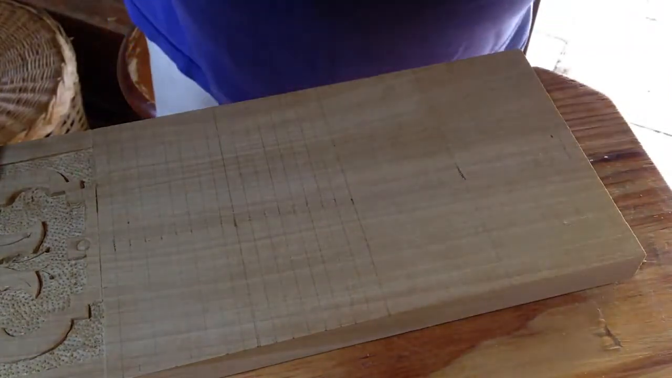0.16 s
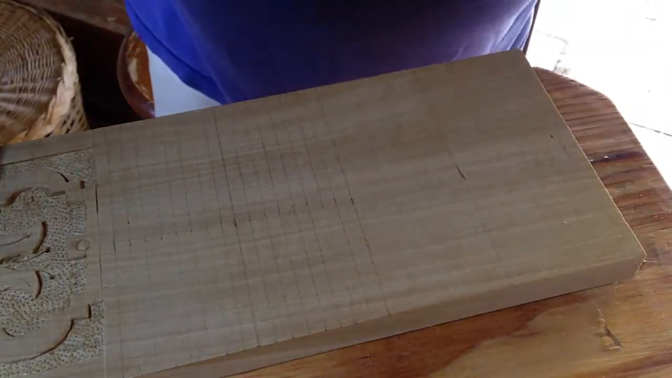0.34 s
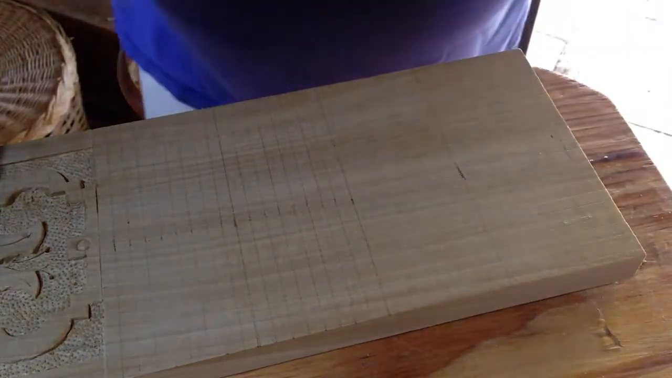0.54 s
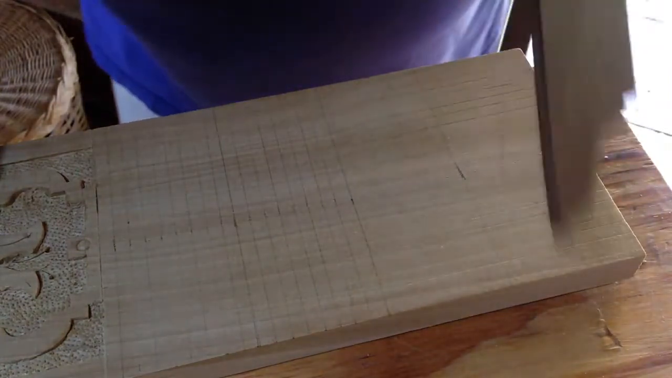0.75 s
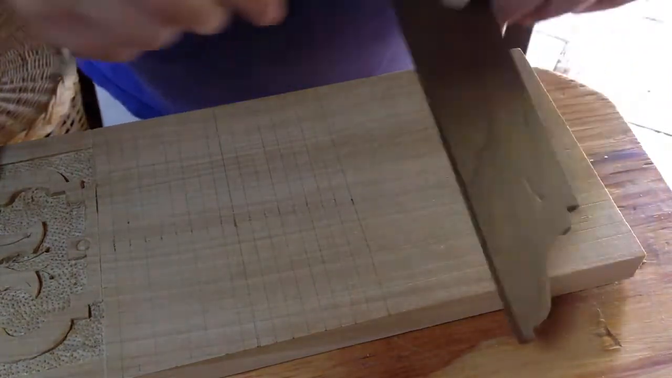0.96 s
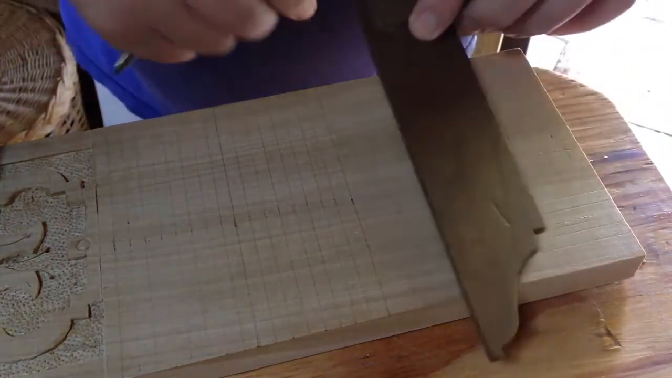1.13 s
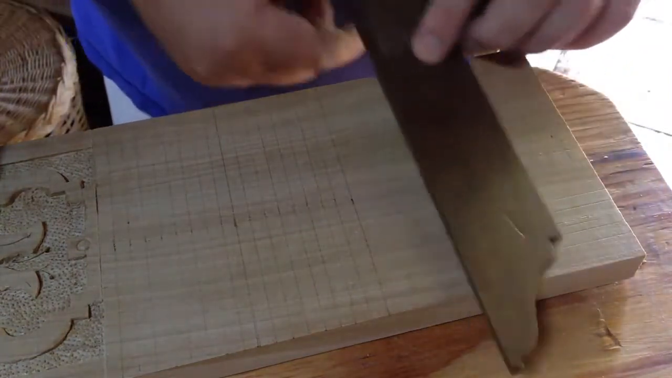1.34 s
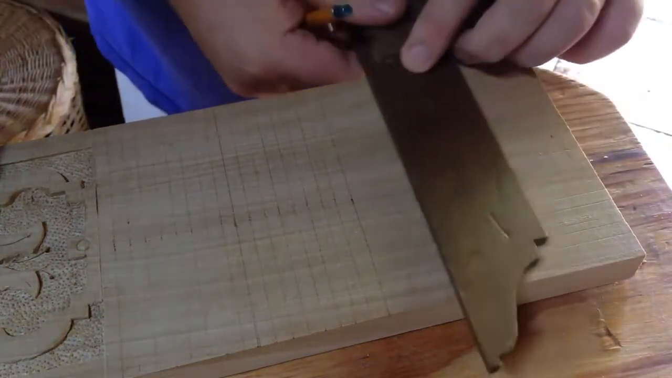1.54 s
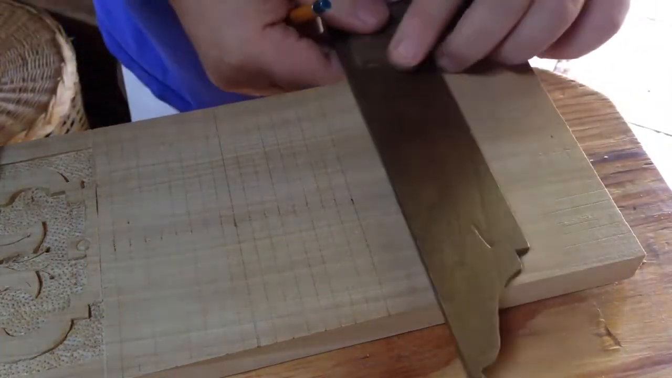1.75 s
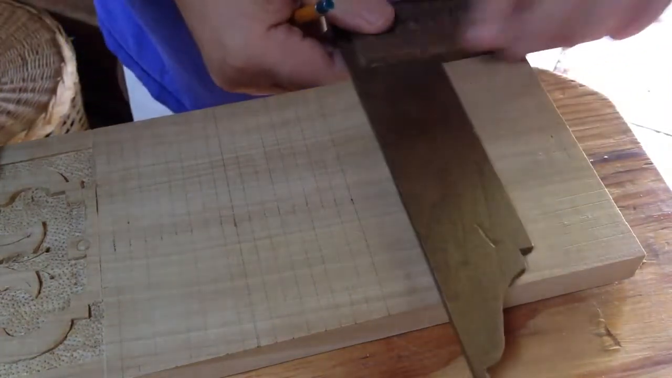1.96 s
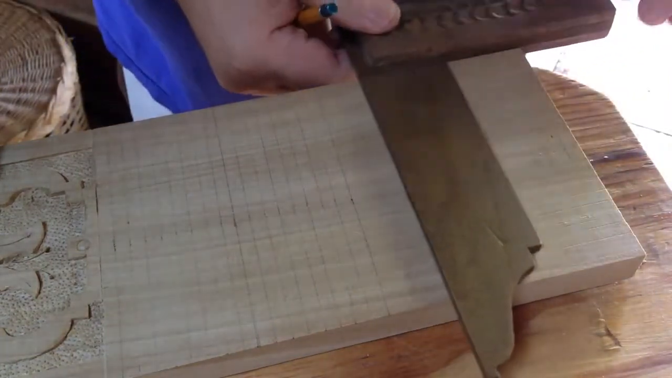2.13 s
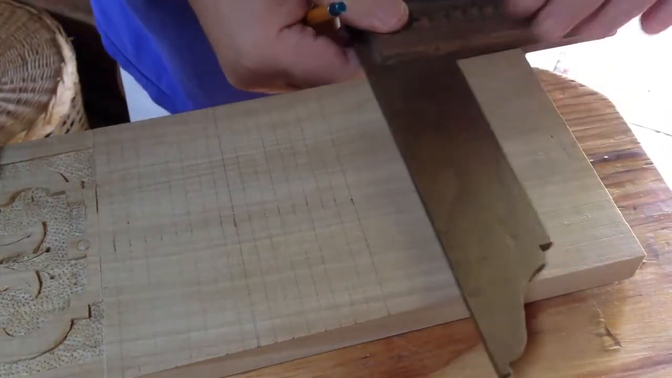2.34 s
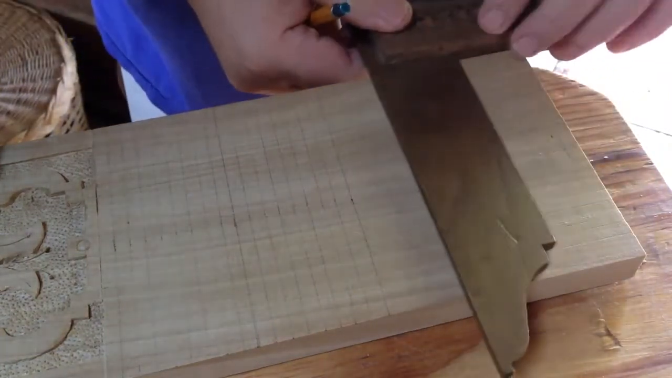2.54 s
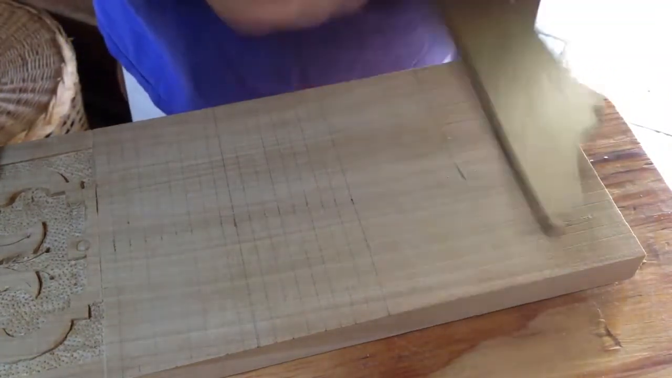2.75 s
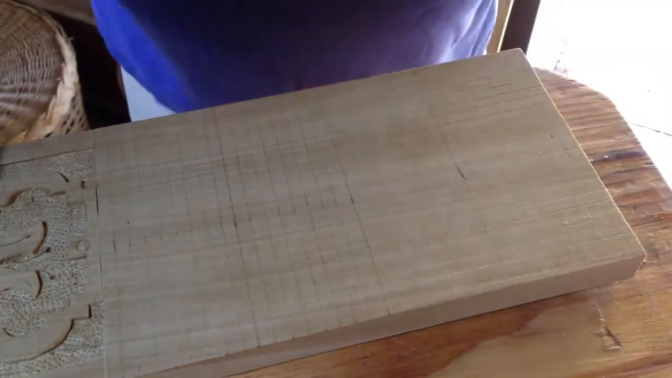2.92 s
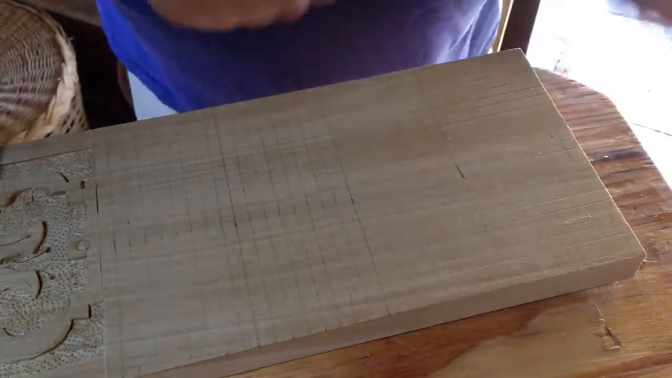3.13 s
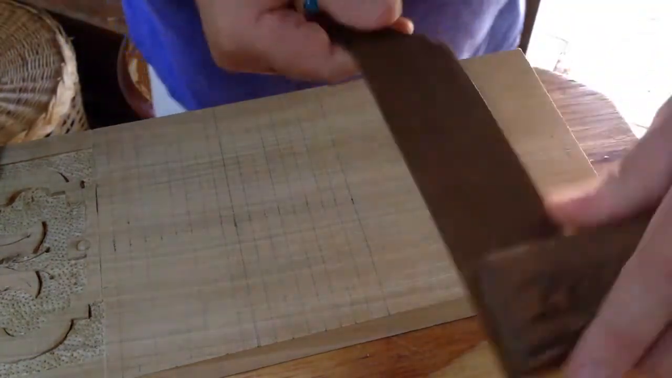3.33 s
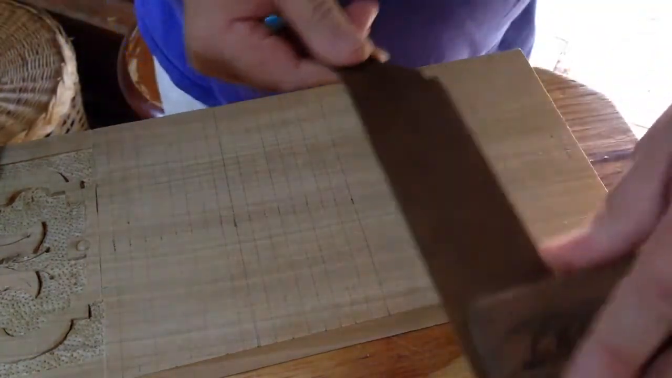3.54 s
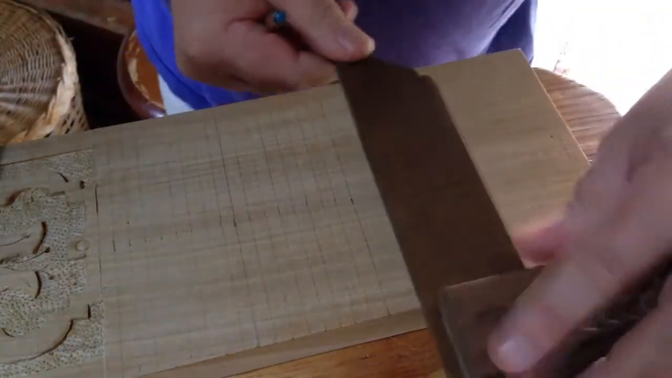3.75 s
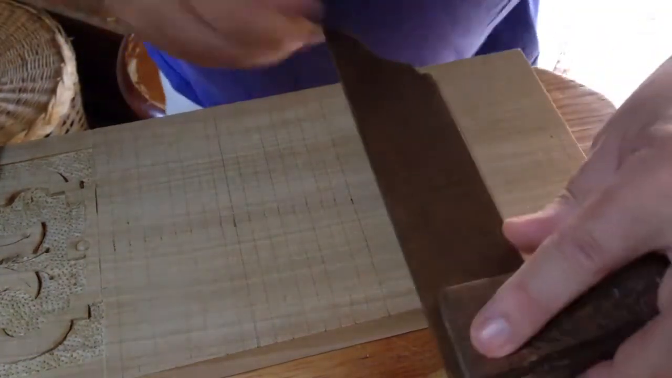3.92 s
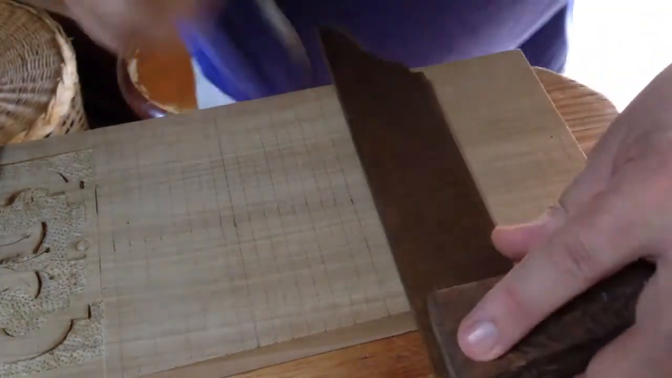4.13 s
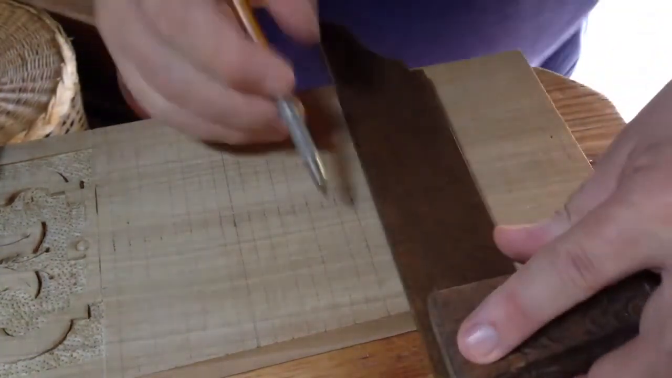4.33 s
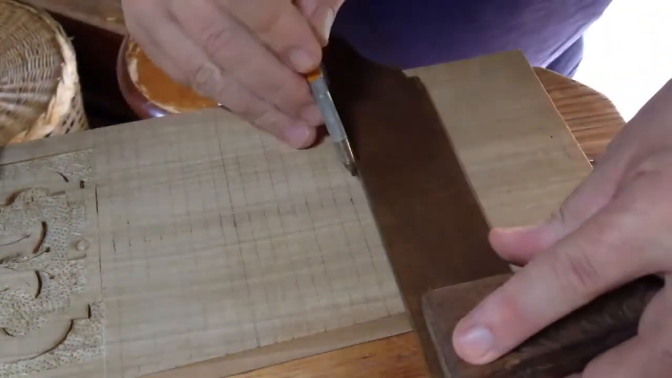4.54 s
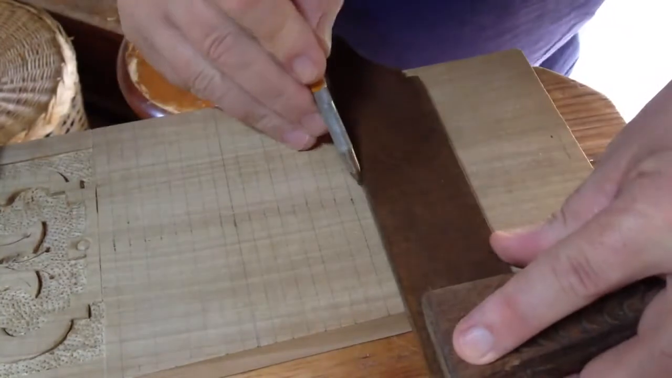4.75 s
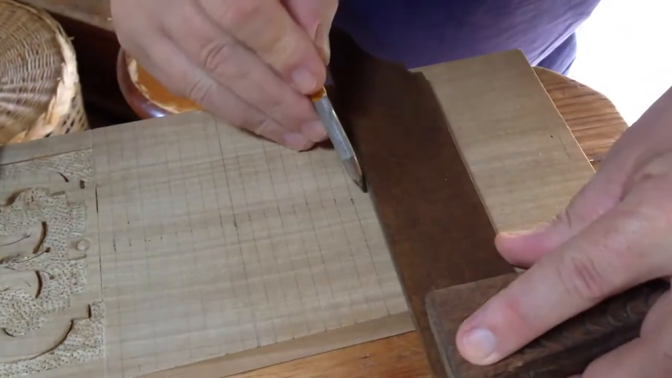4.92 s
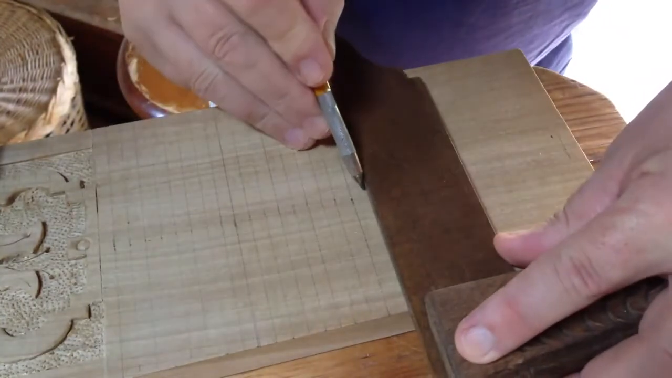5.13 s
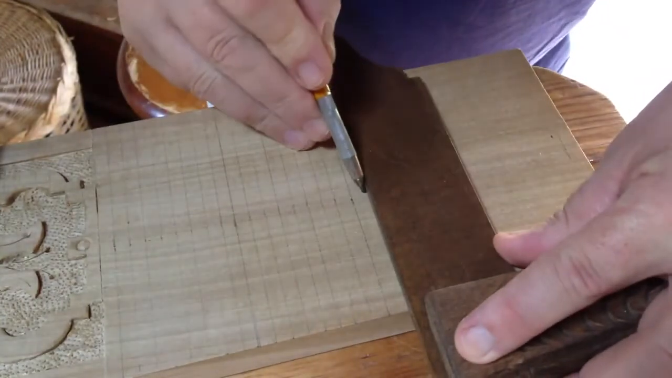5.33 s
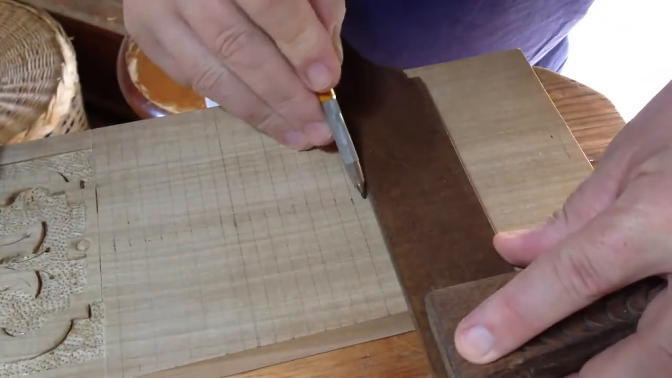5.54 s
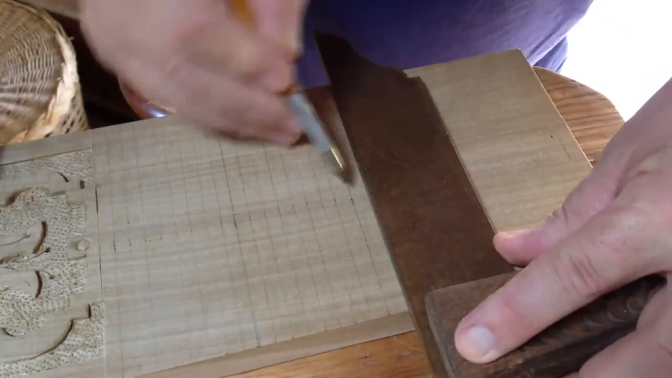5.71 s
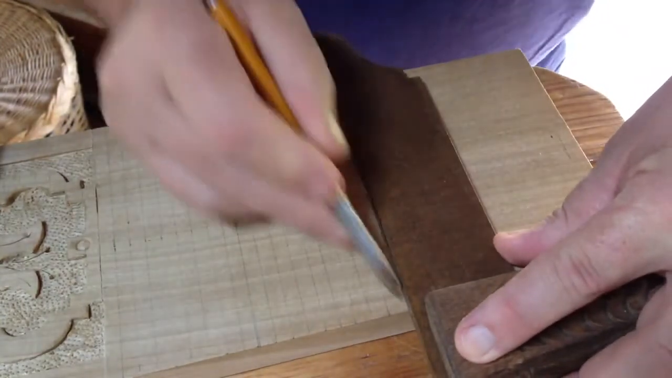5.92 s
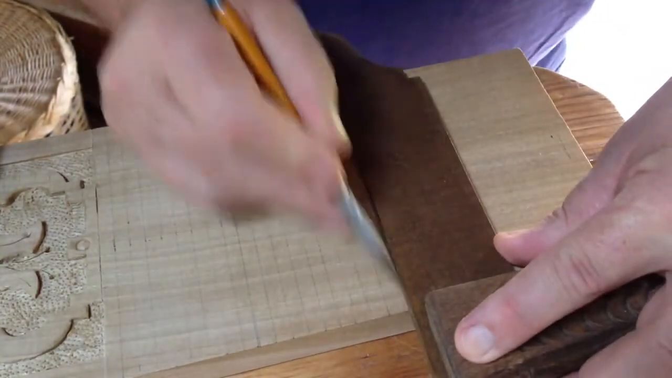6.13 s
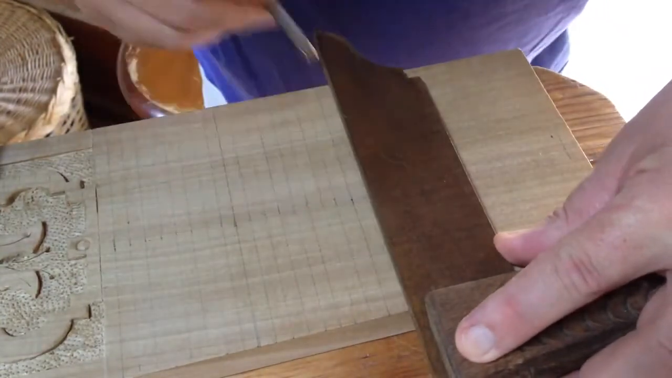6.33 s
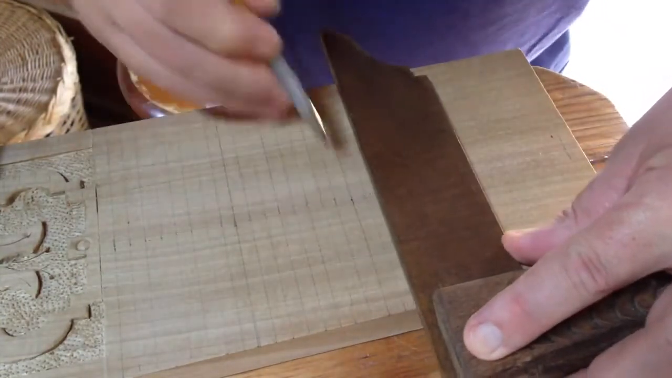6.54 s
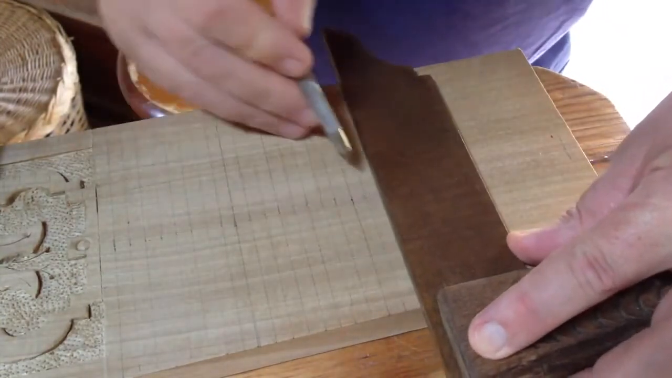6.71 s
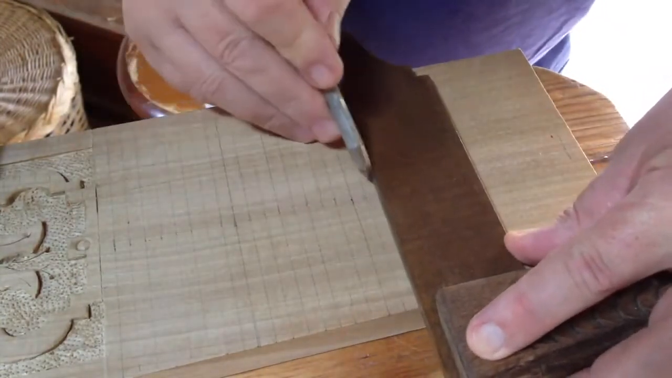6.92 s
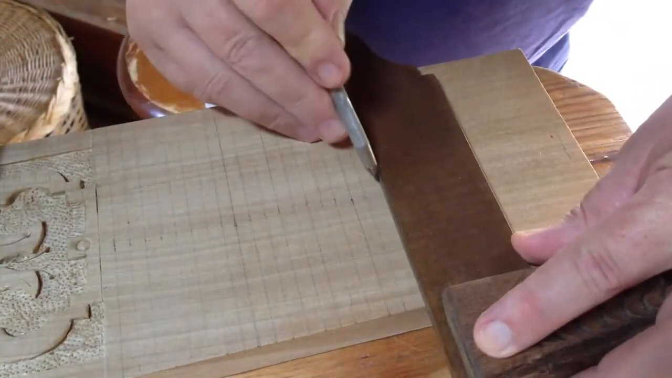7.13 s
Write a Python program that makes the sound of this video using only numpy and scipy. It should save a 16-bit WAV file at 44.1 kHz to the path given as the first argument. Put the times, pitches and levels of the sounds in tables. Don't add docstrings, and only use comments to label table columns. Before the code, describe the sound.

A quiet workshop heard close up, with faint hiss, an unsteady low motor hum and a short woody room tail. The first second holds only soft rubbing and a small scuff near 0.7. At 1.2 a wooden square knocks the plank sharply, twice in quick succession, followed by scuffs, a firm knock at 1.5 and a light press at 1.8; thin birds pipe far off. Gentle handling until scuffs at 2.7-2.9 and sleeve rustle. At 3.5 the square drops flat with a loud clack, drags, and is pressed home with two hard knocks around 3.7, plus low palm thumps to 4.1. Then near quiet, with tiny nudges at 4.6-4.8 and faint ticks. Light pencil touches come at 5.7-6.1, then a brief rasping stroke from 6.2 to 6.45, gritty and catching, strongest near 6.36. A last nudge at 6.7, faint bird whistles and a tiny scuff end it by 7.3.

```python
import sys
import numpy as np
from scipy import signal
from scipy.fft import rfft, irfft, next_fast_len
from scipy.io import wavfile
from scipy.ndimage import uniform_filter1d, map_coordinates

SR = 44100
rng = np.random.default_rng(int(sys.argv[2]) if len(sys.argv) > 2 else 0)


def voltage_ratio(decibels):
    exponent = np.asarray(decibels, float) / 20
    return 10 ** exponent


def materialize(psi):
    bounded = np.clip(np.atleast_2d(psi).T, -1, 1)
    quanta = np.round(bounded * 32767).astype(np.int16)
    wavfile.write(sys.argv[1], SR, quanta)


N = 320607

# f/Hz, level/dB, t60/s
SQUARE_MODES = [(292.4, 7.5, 0.1), (428, -4.5, 0.084), (544, 6, 0.028), (706, 2, 0.032), (1400, -5, 0.077),
                (1358, -2, 0.038), (1208, -7.5, 0.045), (1826, -12, 0.081), (2130, -4.5, 0.075),
                (2480, 1.5, 0.045), (2700, 0.5, 0.0184), (3334, 0.5, 0.032), (3754, 0.5, 0.034),
                (4380, -15, 0.0406), (4730, 6.5, 0.017), (5080, 6.5, 0.012), (6460, -7, 0.017),
                (6714, -3, 0.026), (7880, -16, 0.0094), (8540, -14.5, 0.0074)]
LEAD_IN_S = 0.0007


def unit(x):
    return x / np.sqrt(np.mean(x ** 2) + 1e-20)


def along(points, hz):
    f, v = np.transpose(points)
    return np.interp(np.log(hz + 1), np.log(f + 1), v)


def curves(rows):
    s, *cols = np.transpose(rows)
    return [np.interp(np.arange(N) / SR, s, c) for c in cols]


def wobble(rate_hz):
    knots = rng.standard_normal(int(N * rate_hz / SR) + 4)
    return map_coordinates(knots, [np.arange(N) * rate_hz / SR])


def filtered(x, response):
    m = next_fast_len(N + SR // 2)
    return irfft(rfft(x, m) * response(np.fft.rfftfreq(m, 1 / SR)), m)[..., :N]


def resonant(x, peaks):
    def response(f):
        total = 0
        for k, (centre, width, db) in enumerate(peaks):
            damping = 1j * f * width
            total = total + (-1) ** k * voltage_ratio(db) * damping / (centre * centre - f * f + damping)
        return total
    return unit(filtered(x, response))


def coloured(x, spectrum):
    return unit(filtered(x, lambda hz: voltage_ratio(along(spectrum, hz))))


def patchy(x, depth_db, size):
    z = signal.stft(x, nperseg=size)[2]
    field = uniform_filter1d(rng.standard_normal(z.shape), 6, 0)
    field = uniform_filter1d(field, 10, 1)
    return signal.istft(z * voltage_ratio(depth_db * unit(field)), nperseg=size)[1][:N]


def grains(rate_hz, spread_db):
    hit = rng.random(N) < rate_hz / SR
    sign = rng.choice([-1, 1], N)
    return unit(hit * sign * voltage_ratio(spread_db * np.clip(rng.exponential(size=N), 0, 3)))


def gesture(start_s, length_s, rise_s, fade_s):
    t = np.arange(N) / SR - start_s
    return np.clip(t / rise_s, 0, 1) ** 2 * np.exp(-np.clip(t - length_s, 0, None) / fade_s)


def air():
    # f/Hz, level/dB per Hz
    floor = [(12, -64.5), (20, -36.5), (62, -10.5), (118, -8.5), (152, -9), (185, -14), (231, -16),
             (304, -23), (531, -26.5), (741, -30.5), (1220, -34.5), (1360, -43), (1660, -34), (2010, -33.5),
             (15300, -35.5)]
    return voltage_ratio(-66) * coloured(patchy(rng.standard_normal(N), 0.85, size=512), floor)


def hum():
    # t/s, level/dB
    loudness = [(0, -92), (.16, -73), (.56, -71), (.65, -89), (.81, -69.5), (1.4, -80), (1.6, -71.5),
                (2.55, -58), (3.55, -60.5), (3.68, -71.5), (3.83, -61), (4.4, -63.5), (4.78, -67),
                (5.3, -63.5), (6.28, -60.5), (7.27, -65.5)]
    # multiple of main order, level/dB
    orders = [(.5, -19.5), (1.5, -20.5), (2, -27.5), (2.5, -29)]
    turn = 2 * np.pi * np.cumsum(152.3 + 0.733 * wobble(4)) / SR
    weak = sum(voltage_ratio(db + 1.1 * wobble(3.2)) * np.sin(k * turn) for k, db in orders)
    main = voltage_ratio(0.33 * wobble(14)) * np.sin(turn)
    return np.sqrt(2) * voltage_ratio(curves(loudness)[0]) * (main + weak)


def birds():
    # start t/s, end t/s, f/Hz, level/dB
    pipes = [(1.27, 1.37, 3080, -66), (1.61, 1.654, 3050, -66), (1.659, 1.713, 3010, -64),
             (4.44, 4.57, 4270, -73.5), (6.018, 6.042, 3080, -71), (6.528, 6.556, 3160, -71),
             (6.567, 6.607, 3170, -71), (6.605, 6.715, 4755, -71), (6.72, 6.78, 4775, -79),
             (6.78, 6.858, 4775, -73), (6.862, 6.9, 4780, -77), (6.9, 7.03, 4770, -80),
             (6.945, 6.976, 3170, -67), (6.985, 7.035, 3180, -71), (7.025, 7.105, 4710, -65),
             (7.095, 7.175, 4722, -67), (7.16, 7.245, 4715, -74)]
    t, out = np.arange(N) / SR, np.zeros(N)
    for start, end, hz, db in pipes:
        swell = np.sin(np.pi * np.clip((t - start) / (end - start), 0, 1)) ** 0.62
        level = voltage_ratio(db + 2.5 * np.tanh(wobble(40)))
        out += swell * level * np.sin(2 * np.pi * np.cumsum(hz + 8 * wobble(20)) / SR)
    return out


def shop(x):
    # f/Hz, t60/s
    decay = [(150, 0.49), (1000, 0.31), (4000, 0.18), (10000, 0.058)]
    out, step = np.zeros(N + 2 * SR), SR // 5
    for i in range(0, N, step):
        hz, t, z = signal.stft(rng.standard_normal(SR // 2), SR, nperseg=256)
        dying = voltage_ratio(-60 * t / along(decay, hz)[:, None])
        tail = signal.istft(z * dying, SR, nperseg=256)[1]
        wet = signal.fftconvolve(x[i:i + step], tail / np.linalg.norm(tail))
        out[i + 200:][:len(wet)] += wet
    return out[:N]


def palm_thumps():
    # t/s, peak level/dB, f/Hz, t60/s
    thumps = [
        (1.906, -36, 125, 0.031),
        (3.737, -29, 104, 0.1),
        (3.932, -33.5, 80, 0.059),
        (4.12, -53, 50.3, 0.22),
    ]
    out, t = np.zeros(N + SR), np.arange(SR // 3) / SR
    for s, db, hz, t60 in thumps:
        swell = 1 - np.exp(-t / 0.012)
        out[round(s * SR):][:len(t)] += voltage_ratio(db - 60 * t / t60) * np.sin(2 * np.pi * hz * t) * swell
    return out[:N]


def rubbing():
    # t/s, level/dB
    hands = [(0, -71.5), (.26, -75.5), (.63, -76), (1.01, -80.5), (1.23, -72), (1.38, -67.5), (1.72, -69),
             (2.21, -78.5), (2.47, -76), (2.89, -68.5), (3.3, -72), (3.48, -67.5), (4.07, -71.5),
             (4.25, -74), (4.44, -72), (4.52, -70), (5.02, -79), (5.79, -78.5), (7.27, -80)]
    moves = [(0, 0.049, -70.5, 1), (2.7, 0.039, -64, 0.7), (2.84, 0.032, -63.5, 1), (3.04, 0.41, -70, 0.75),
             (3.53, 0.058, -57.5, 0.25), (3.575, 0.15, -51, 0.13), (3.664, .024, -51.5, 0.34),
             (3.69, 0.055, -49.5, 0.048), (3.78, 0.069, -58, 0.32), (3.93, 0.068, -55.5, 0.43),
             (4.03, 0.06, -65, 0), (5.7, 0.047, -65.5, 0.27)]
    # f/Hz, width/Hz, level/dB
    skin_peaks = [(1394, 246, -4), (2270, 900, -3), (3410, 370, -0.5), (3830, 227, -1.5), (5096, 690, -6),
                  (6370, 500, -15)]
    # f/Hz, level/dB per Hz
    cloth_spectrum = [(2000, -41.5), (4000, -6), (7000, -6.5), (10000, -10.5), (15000, -19.5)]
    # f/Hz, width/Hz, level/dB
    drag_peaks = [(275, 94, 4.5), (454, 170, -1.5), (686, 230, -5), (1060, 310, -6.5), (1320, 170, -4)]
    light_range_db = 22.5

    busy_db, = curves(hands)
    dragged, brushed = np.zeros(N), np.zeros(N)
    for s, length, db, light in moves:
        shape = voltage_ratio(db) * gesture(s, length, rise_s=0.022, fade_s=0.0413)
        dragged += shape * voltage_ratio(-light_range_db * light)
        brushed += shape * voltage_ratio(-light_range_db * (1 - light))
    excess_db = busy_db + 69.5
    skin = voltage_ratio(busy_db) + voltage_ratio(-10.5) * dragged
    cloth = voltage_ratio(-73.5 + 0.72 * excess_db) + brushed
    drag = voltage_ratio(-76 + 0.51 * excess_db) + dragged

    flutter = voltage_ratio(1.4 * wobble(25))
    fingers = skin * flutter * resonant(grains(3000, spread_db=0), skin_peaks)
    weave = patchy(grains(4000, spread_db=-1), 2.5, size=512)
    sleeve = cloth * flutter * coloured(weave, cloth_spectrum)
    slide = drag * voltage_ratio(3.6 * wobble(18)) * resonant(grains(1500, spread_db=2.0), drag_peaks)
    return fingers + sleeve + slide


def held_hiss(bands):
    q, out = 21, np.zeros(N)
    for start, end, hz, db in bands:
        u = np.linspace(0, 1, round((end - start) * SR))
        edges_hz = [hz - hz / q / 2, hz + hz / q / 2]
        sos = signal.butter(2, edges_hz, "band", fs=SR, output="sos")
        hiss = unit(signal.sosfilt(sos, rng.standard_normal(len(u))))
        out[round(start * SR):][:len(u)] += voltage_ratio(db) * np.sin(np.pi * u) ** 0.5 * hiss
    return out * voltage_ratio(1.2 * np.tanh(wobble(30)))


def rustles():
    bands = [(0.03, .3, 2060, -77), (1.852, 2.53, 1380, -79.5), (2.58, 3.15, 1820, -73),
             (2.8, 3, 2180, -75), (1.41, 1.49, 1420, -61), (2.713, 2.9, 7700, -72),
             (3.045, 3.126, 5150, -68), (3.056, 3.13, 3750, -69), (3.143, 3.267, 1300, -74),
             (3.18, 3.27, 5100, -70), (3.39, 3.523, 6100, -73), (3.39, 3.52, 5200, -68),
             (3.34, 3.518, 3630, -73), (3.4, 3.52, 7900, -72), (3.798, 3.874, 3500, -63),
             (4.35, 4.39, 2470, -66), (4.43, 4.47, 2450, -75), (4.555, 4.68, 2430, -71),
             (4.47, 4.6, 1800, -77), (4.61, 4.8, 1750, -73), (6.21, 6.25, 9200, -71),
             (2.87, 2.905, 3350, -55), (2.875, 2.905, 7550, -58.5), (2.885, 2.905, 6140, -59),
             (.677, .7, 2150, -62), (.678, .695, 1800, -66), (.695, .72, 2200, -73),
             (.675, .695, 1500, -65), (6.242, 6.3, 3500, -54.5), (6.35, 6.41, 3470, -55),
             (5.924, 5.97, 3500, -70.5), (1.343, 1.378, 5000, -63), (1.343, 1.372, 6600, -66),
             (1.42, 1.448, 6600, -60), (1.432, 1.472, 3850, -61), (1.383, 1.412, 3100, -65),
             (3.537, 3.585, 867, -51), (3.535, 3.56, 1040, -52), (3.54, 3.597, 1680, -51),
             (3.53, 3.545, 3510, -56), (3.56, 3.585, 2550, -60), (4.25, 4.32, 5500, -79),
             (4.425, 4.462, 6700, -73), (4.42, 4.465, 4700, -72), (4.88, 4.97, 5400, -79),
             (4.922, 4.938, 6600, -74), (1.2, 1.237, 6600, -64), (1.214, 1.238, 3200, -61),
             (6.41, 6.45, 700, -61), (6.43, 6.465, 1330, -61)]
    return held_hiss(bands)


def pencil():
    # t/s, pressure level/dB, lead f/Hz, grit level/dB, plank level/dB
    line = [
        (6.172, -72, 2350, -3, -1),
        (6.185, -54.5, 2460, -10.5, -6),
        (6.259, -48.5, 2460, -6, -1.5),
        (6.3, -51, 2270, -4, -3),
        (6.325, -49, 1930, -5, 1),
        (6.345, -50, 1850, -4, 3),
        (6.37, -45, 1850, -7.5, -1.5),
        (6.41, -45.5, 2350, -7, 0),
        (6.424, -58, 2210, 0, 5),
        (6.468, -78, 2140, 4, 6),
    ]
    # start t/s, length/s, level/dB, lead f/Hz, grit level/dB
    touches = [
        (5.719, 0.0087, -62.5, 1850, -13),
        (5.907, 0.068, -71, 2080, 5.5),
        (6.029, 0.017, -65, 1930, -3),
        (6.052, 0.044, -64, 2000, -4.5),
    ]
    # f/Hz, width/Hz, level/dB
    plank_peaks = [(404, 82, -7), (728, 70, 4.5), (1040, 71, 2.5), (1354, 150, 5.5)]
    # f/Hz, level/dB per Hz
    grit_spectrum = [(2300, -33), (2800, -2), (3150, 1), (3500, -4), (4100, -4), (6000, -6.5), (7500, -14),
                     (9200, -15.5), (12000, -19), (15000, -30)]
    catch_share, grips_hz = 0.45, [1870, 2290, 2520]

    smooth, catches = grains(9000, spread_db=5.5), grains(760, spread_db=1.5)
    slips = np.sqrt(1 - catch_share) * smooth + np.sqrt(catch_share) * catches
    leads = [resonant(resonant(slips, [(c, 260, 0)]), [(c, 260, 0)]) for c in grips_hz]
    plank = resonant(slips, plank_peaks)
    grit = voltage_ratio(1.1 * wobble(60)) * coloured(patchy(smooth, 1.6, size=256), grit_spectrum)

    t = np.arange(N) / SR
    db, *settings = curves(line)
    drawn = (t > line[0][0]) * (t < line[-1][0])
    strokes = [(voltage_ratio(db + 0.58 * wobble(70)) * drawn, *settings)]
    for s, length, db, hz, grit_db in touches:
        pressure = voltage_ratio(db) * gesture(s, length, rise_s=0.0084, fade_s=0.013)
        strokes.append((pressure, hz, grit_db, 0.5))

    out = np.zeros(N)
    for pressure, lead_hz, grit_db, plank_db in strokes:
        lead = 0
        for sound, chosen in zip(leads, np.eye(len(grips_hz))):
            lead = lead + np.sqrt(np.interp(lead_hz, grips_hz, chosen)) * sound
        out += pressure * (lead + voltage_ratio(plank_db) * plank + voltage_ratio(grit_db) * grit)
    return out


def ridges():
    # t/s, peak level/dB
    jumps = [(6.0385, -46), (6.0505, -45), (6.0525, -46), (6.0775, -44), (6.183, -45), (6.211, -42),
             (6.255, -38), (6.269, -36), (6.282, -41), (6.3125, -30), (6.322, -33), (6.330, -30),
             (6.350, -33), (6.3595, -25), (6.370, -28), (6.378, -28), (6.385, -35), (6.391, -34),
             (6.398, -33), (6.406, -26.5), (6.415, -34), (6.421, -38)]
    # f/Hz, width/Hz, level/dB
    knock_peaks = [(720, 90, -6), (1060, 140, -2.5), (1340, 100, 4), (1870, 180, 0), (2300, 260, -7),
                   (3500, 500, -14)]
    blows = np.zeros(N)
    for s, db in jumps:
        blows[round((s - LEAD_IN_S) * SR)] = voltage_ratio(db) * rng.choice([-1, 1])
    pushes = filtered(blows, lambda f: 1 / (1 + 1j * f / 3200) ** 2)
    late = pushes * (np.arange(N) > 6.375 * SR)
    knock = resonant(pushes, knock_peaks) + voltage_ratio(-9) * resonant(late, [(2350, 220, 0)])
    return voltage_ratio(-25.5) * knock / np.abs(knock).max()


def ring(modes, weights_db, scatter_db, clatter_db, free_s=1):
    centres = [330, 780, 1400, 2900, 5800]
    t = np.arange(SR // 4) / SR

    def rise(s):
        return np.sin(np.pi / 2 * np.clip(t / s, 0, 1)) ** 2

    hz, level, t60 = np.transpose(modes)[:, :, None]
    chance = rng.standard_normal((3,) + hz.shape)
    families = list(zip(centres, weights_db))
    envelope = voltage_ratio(along(families, hz) + level + scatter_db * chance[0] - 60 * t / t60)
    tones = envelope * np.sin(2 * np.pi * hz * (1 + 0.0084 * chance[1]) * t + 0.93 * chance[2])
    tones = tones * voltage_ratio(-20 * np.clip(hz / 900, 0, 1) * (1 - np.exp(-(t / free_s) ** 4)))

    f, frame_s, z = signal.stft(rng.standard_normal(len(t)), SR, nperseg=128, noverlap=112)
    weight = along(families + [(9000, weights_db[-1] - 25)], f)[:, None]
    dying = weight - 60 * frame_s / (0.017 + 45 / (f[:, None] + 300))
    clatter = signal.istft(z * voltage_ratio(dying + clatter_db), SR, nperseg=128, noverlap=112)[1][:len(t)]
    return (tones * rise(0.00011 + 0.77 / hz)).sum(axis=0) + clatter * rise(0.0021)


def struck(hits, modes, clatter_db, low_db, low_grows):
    out = np.zeros(N + SR)
    for s, db, body, blade, tip, free_s in hits:
        over_db = db + 20
        low = body + low_db + low_grows * over_db
        damped = np.array(modes) * [1, 1, np.clip(1.5 + 0.0059 * over_db, 0.4, 1)]
        sound = ring(damped, [low, body, 0, blade, tip], 1.2, clatter_db, free_s)
        out[round(s * SR):][:len(sound)] += voltage_ratio(db - 2.5) * sound
        out[round((s - LEAD_IN_S) * SR):][:len(sound)] += voltage_ratio(db - 16) * sound
    return filtered(out[:N], lambda f: (1j * f / (1j * f + 190)) ** 4)


def plank_knocks():
    # t/s, peak level/dB, body, blade, tip level/dB re main ring, free ring/s
    hits = [
        (0.2972, -60, -1.5, -17, -10, .03),
        (1.505, -38.5, -4, -5, -34, 0.033),
        (1.677, -59.5, -2, -2, -18, .05),
        (3.8525, -48.5, 10, -16, -10, 0.031),
        (4.0347, -61.5, 6.5, -5, -16, 0.034),
        (5.054, -63, 1, -26, -2, 0.014),
        (5.6251, -61.5, -1.5, -18, -21.5, 0.017),
        (6.0378, -58, -1.5, 5, -25, .01),
        (7.1741, -66, 5, -19, 1, .03),
    ]
    # f/Hz, level/dB, t60/s
    modes = [(231, -4.5, 0.16), (282, 6, 0.046), (421, 12, 0.041), (512, -10, 0.056), (618, 3, 0.093),
             (712, 8, 0.054), (870, -1, 0.038), (1000, -11, 0.069), (1220, -27, 0.053), (1435, -2.5, 0.035),
             (1475, 2.5, 0.024), (1790, -2.5, 0.039), (1930, 0, 0.025), (2110, -4, 0.061), (2500, -2, .02),
             (2750, 3.5, 0.0076), (3180, 3, 0.016), (3930, -2, .012), (4270, -6.5, 0.01464),
             (5220, -2, 0.01063)]
    return struck(hits, modes, clatter_db=4, low_db=-1.5, low_grows=-0.05)


def creeps():
    bands = [(4.5, 4.58, 1380, -76), (4.7, 4.82, 3150, -78), (4.73, 4.77, 2400, -72),
             (4.79, 4.872, 1750, -74), (4.8, 4.99, 1350, -77.5), (5.06, 5.116, 720, -79),
             (5.14, 5.18, 1350, -75), (5.755, 5.775, 1400, -68.5), (5.915, 5.967, 1700, -74),
             (5.97, 6.015, 1400, -75), (3.53, 3.542, 1800, -46.5), (3.745, 3.757, 1100, -52),
             (6.325, 6.343, 1350, -42.5), (4.555, 4.61, 2450, -71), (2.9, 3.3, 5200, -78),
             (2.6, 3.2, 3300, -77), (6.31, 6.335, 3150, -57), (3.76, 3.88, 87, -61),
             (6.59, 6.61, 1400, -74), (6.075, 6.095, 2800, -69), (1.28, 1.345, 1230, -55),
             (1.285, 1.36, 2150, -62), (3.712, 3.737, 319, -45), (2.887, 2.899, 3320, -51.5),
             (2.888, 2.899, 7600, -56), (3.283, 3.297, 3400, -64), (4.36, 4.39, 2450, -70),
             (1.82, 1.835, 730, -57)]
    return held_hiss(bands)


def scuffs():
    rubs = [(0.553, 0.042, -54.5, -26, -22), (0.675, 0.015, -45, -11.5, -27), (1.186, 0.044, -47, -9, -10),
            (1.33, 0.029, -56, -51, -14), (1.401, 0.043, -46, -32, -2), (1.443, 0.023, -49, -32, 4),
            (1.482, 0.063, -52, -22, -3), (2.698, 0.074, -54, -28, 5), (2.831, 0.067, -50.5, 0, 18),
            (2.883, 0.013, -40, -10, 8), (3.278, 0.015, -49, -38, -11), (3.987, 0.025, -42.5, -3.5, -12),
            (7.073, 0.0167, -52.5, 2, -10)]
    out, slips = np.zeros(N + SR), grains(6000, spread_db=9.5)
    for s, length, db, main, blade in rubs:
        u = np.linspace(0, 1, round(length * SR))
        swell = u ** 0.654 * np.clip((1 - u) / 0.12, 0, 1)
        push = slips[round(s * SR):][:len(u)] * swell
        body = ring(SQUARE_MODES, [main - 21, main - 16, main, blade, 0], scatter_db=4, clatter_db=-12)
        sound = signal.fftconvolve(push, body)
        out[round(s * SR):][:len(sound)] += voltage_ratio(db) * sound / np.abs(sound).max()
    return out[:N]


def square_pressed():
    # t/s, peak level/dB, body, blade, tip level/dB re main ring, free ring/s
    hits = [
        (1.8138, -39.5, -8.5, -3, -12, .016),
        (3.689, -22.5, -10.5, -1, -14, 0.014),
        (3.7108, -18.5, -32, -6.5, -9.5, .007),
    ]
    # f/Hz, level/dB, t60/s
    modes = [(252, 6.5, 0.074), (312, 4.5, 0.13), (762, 3.5, 0.092), (1287, -19.5, 0.03), (1420, -13, 0.03),
             (1365, 2.5, 0.082), (2100, -28, 0.012), (2650, 1.5, 0.018), (2885, 0.5, 0.015),
             (3360, 2.5, 0.015), (3960, -1, 0.016), (4280, -3, 0.012), (5300, -3.5, 0.014),
             (6100, -7.5, 0.0098), (8300, -11.5, 0.007)]
    return struck(hits, modes, clatter_db=-6, low_db=1.5, low_grows=0.05)


def square_laid():
    # t/s, peak level/dB, body, blade, tip level/dB re main ring, free ring/s
    hits = [
        (3.5216, -18, -9, -1.5, -26.5, .03),
    ]
    # f/Hz, level/dB, t60/s
    modes = [(292, 10.5, .03), (382, 5, .045), (560, 5.5, 0.039), (732, 8.5, .046), (867, -1, .04),
             (1050, -2.5, 0.072), (1313, 8, .018), (1906, -4.5, .02), (2240, 0, .015), (2660, 8, .013),
             (3080, -1.5, .012), (3430, 8, .011), (3800, -0.5, 0.0089), (4300, -12.5, .011),
             (5150, 0.5, .01)]
    return struck(hits, modes, clatter_db=-1, low_db=0, low_grows=0)


def square_hits():
    # t/s, peak level/dB, body, blade, tip level/dB re main ring, free ring/s
    hits = [
        (1.2401, -21, -9.5, -8, -7.5, 0.018),
        (1.2445, -25.5, -10.5, -18, -29, .01),
        (1.2726, -25, -17, -13.5, -14, 0.018),
        (2.584, -51.5, -2.5, -20, -27, .02),
        (4.582, -56, -3, -12, -20, 0.0077),
        (4.6904, -43.5, -3.5, -13, -28, 0.0065),
        (4.7683, -47, -4, -21, -34, 0.0076),
        (5.7284, -53.5, 0, -15, -24, .008),
        (6.049, -51, 5.5, -1, -29, 0.01),
        (6.6928, -54.5, -11, -23, -25, .007),
    ]
    return struck(hits, SQUARE_MODES, clatter_db=-3, low_db=1.5, low_grows=0.4)


def scene():
    far = air() + hum() + birds()
    hands = rubbing() + rustles() + creeps()
    lead = pencil() + ridges()
    square = scuffs() + square_pressed() + square_laid() + square_hits()
    blows = palm_thumps() + plank_knocks() + square
    into_room = filtered(blows, lambda f: voltage_ratio(-6 * np.exp(-((f - 1370) / 170) ** 2)))
    room = voltage_ratio(-15.0) * shop(into_room + voltage_ratio(-2) * lead)
    return (blows + lead + room + hands + far)[None]


def roll_off(x):
    return signal.sosfilt(signal.butter(12, 15470, fs=SR, output="sos"), x)


def record(dry):
    # t/s, lowest f/Hz affected
    starved = [(.172, 1500), (.768, 700), (.893, 600), (1.03, 1500), (1.1, 1500), (1.427, 500),
               (1.589, 4000), (1.841, 1800), (3.168, 1000), (3.378, 1000), (4.185, 700), (4.328, 700),
               (4.632, 700), (5.305, 1500)]
    out, size = dry.copy(), 2048
    hz = np.fft.rfftfreq(size, 1 / SR)
    window = np.sqrt(np.hanning(size))
    for s, low_hz in starved:
        at = slice(round(s * SR) - size // 2, round(s * SR) + size // 2)
        lines = rfft(dry[0, at] * window)
        usual = np.sqrt(uniform_filter1d(np.abs(lines) ** 2, size=40))
        lost = lines * (hz > low_hz) * (np.abs(lines) < voltage_ratio(3.5) * usual)
        out[0, at] -= 0.9 * irfft(lost) * window
    finished = filtered(out, lambda f: f < 15480)
    return roll_off(finished)


dry = scene()
out = record(dry)
materialize(out)
```